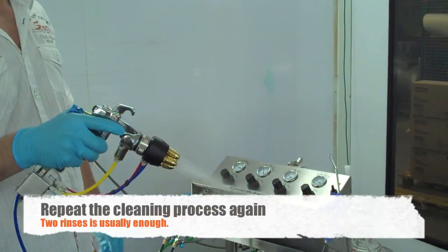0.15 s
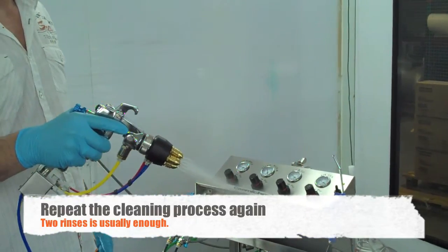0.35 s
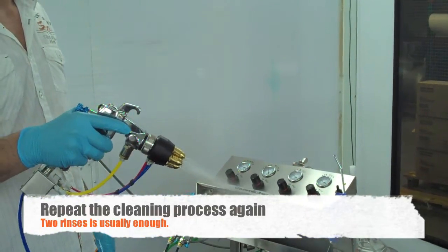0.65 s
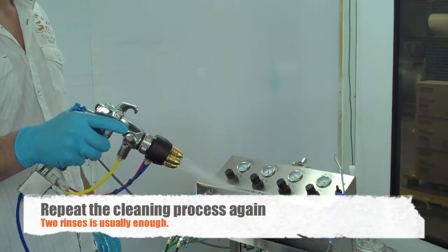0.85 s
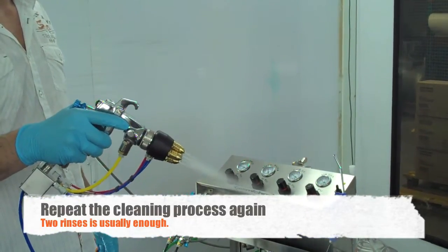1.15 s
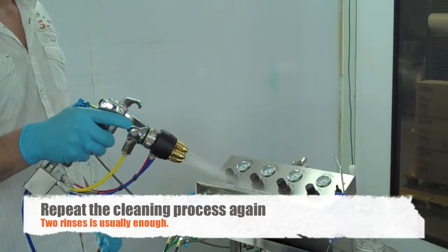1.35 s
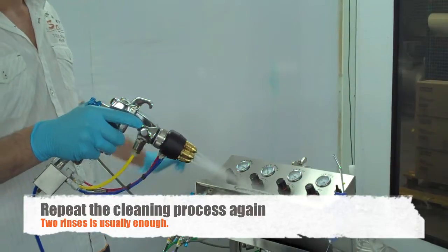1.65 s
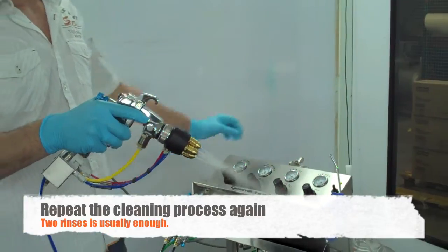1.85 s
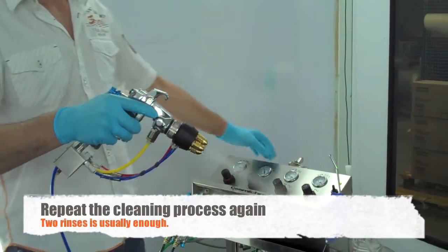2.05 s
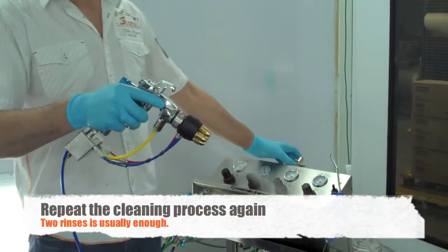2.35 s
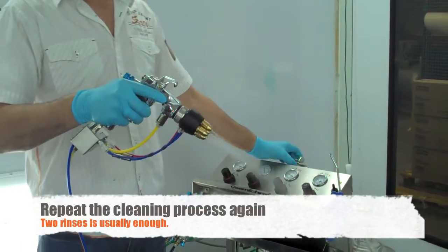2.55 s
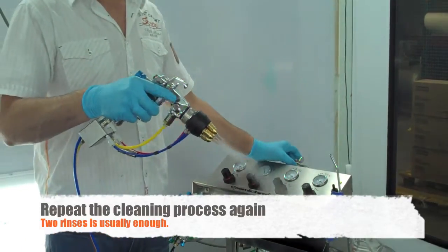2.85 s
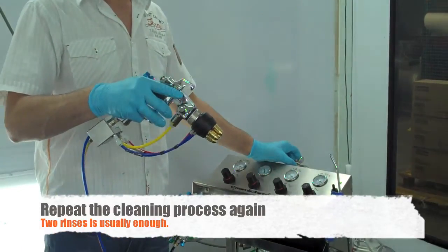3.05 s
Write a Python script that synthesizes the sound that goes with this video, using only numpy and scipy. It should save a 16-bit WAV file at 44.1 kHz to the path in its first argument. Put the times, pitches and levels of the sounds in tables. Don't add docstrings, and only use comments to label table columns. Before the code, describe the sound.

A spray gun's thin air leak swells for half a second, then the valve snaps open into a loud, steady, spitting hiss that stops abruptly, in a small hard-walled booth, picked up at arm's length.

```python
import sys
import numpy as np
from scipy import signal
from scipy.fft import rfft, irfft, next_fast_len
from scipy.io import wavfile
from scipy.ndimage import uniform_filter1d

SR = 44100
rng = np.random.default_rng(int(sys.argv[2]) if len(sys.argv) > 2 else 0)


def generate_wav(sig):
    pcm = np.round(np.clip(np.atleast_2d(sig).T, -1, 1) * 32767).astype(np.int16)
    wavfile.write(sys.argv[1], SR, pcm)


def convert_level_to_amplitude(level_db):
    exponent = np.asarray(level_db, float) / 20
    return 10 ** exponent


N = 141120
T = np.arange(N) / SR

# [t/s, blast level/dB, hose hum against blast/dB, fullness/(dB per octave)]
AIR_FLOW = [(.474, -17, -50, 0.5), (.51, -22, -24, -2), (.55, -23, -33, 0.), (.59, -22.5, -36, -0.5),
            (.65, -26, -40, -0.5), (.72, -21.5, -35, 0), (.79, -23., -37, .5), (.86, -23, -21.5, 0.),
            (1.05, -24, -15.5, 0.), (1.45, -24, -19, -0.5), (1.9, -23.5, -25, -0.55), (1.96, -22, -26, 0.5),
            (2.01, -25, -16.5, -1.5), (2.18, -23, -17, 0.), (2.22, -26.5, -23, -1.5),
            (2.6, -26.5, -23, -.5), (2.8, -24, -20.5, -1), (2.93, -26.5, -22.5, -.5)]
# [f/Hz, density/dB]
JET_SPECTRUM = [(200, -33.5), (520, -9), (1300, -6.5), (3600, -2.65), (6000, -4), (9300, -4),
                (11200, -11.5), (14300, -21.5)]
# [f/Hz, width/Hz, level against blast/dB, middle t/s, spread t/s]
NOZZLE_WHISTLES = [
    (680, 39, -26.5, 1., 1.),
    (1551, 32, -27.5, 1.1, 0.93),
    (4160, 45, -15, 1.1, 0.55),
    (5080, 44, -16, 2.6, 0.33),
    (7100, 45., -14, 2.5, 0.63),
    (8000, 45., -15, 1.7, .7),
]
# [f/Hz, density/dB]
LEAK_SPECTRUM = [(88, -48), (150, -13.5), (298, -19.5), (419, -15), (969, -3), (1450, -6), (2160, -0.5),
                 (9890, -5.5), (14200, -27)]
# [delay t/s, level/dB]
WALL_ECHOES = [
    (.00137, -25),
    (.00274, -17),
    (.0038, -14.5),
    (.0098, -8.5),
]
# [f/Hz, decay time t60/s]
BOOTH_DECAY = [(300, 0.46), (1000, 0.37), (3000, .31), (6000, 0.23), (9000, 0.19), (14000, 0.15)]
# [f/Hz, likeness/(0-1), left lead/rad, left over right level/dB]
PORT_PAIR = [(100, .9, 0., 0.), (600, .98, 0., 0.), (2000, .78, -.1, .3), (4000, .5, -.1, 0.),
             (6200, .2, .2, -1.), (9200, .25, 1.5, -6.3), (11500, .52, 2.9, 1.), (14000, .3, 2.5, 6.)]
# [f/Hz, density/dB]
ROOM_SPECTRUM = [(12, -27), (20, 13), (92, -21), (184, -24), (1050, -22), (1200, -35), (2540, -24),
                 (12000, -40), (15600, -78), (22000, -120)]

EDDIES = 4
CRACK_S, CRACK_DB = 0.416, 4.5
OPEN_S, OPEN_RISE_S = 0.472, 0.0038
SHUT_S, SHUT_DB_PER_S = 2.928, 805
SPIT_DB, SPIT_PER_S, SPIT_SPREAD_DB = -13.5, 1500., 4.0
HOSE_HZ, HOSE_WIDTH_HZ = 525, 47.6
LEAK_DB, LEAK_RISE_DB_PER_S = -36.5, 5
BOOTH_DB, HALL_DB, HALL_LONGER = 1, -13, 2.24
FLOOR_DB, FLOOR_SAME = -66, 0.55
DUCK_S, DUCK_DB = .58, -7


def blast():
    s, level_db, hum_db, full = np.transpose(AIR_FLOW)
    turbulence = white() * convert_level_to_amplitude(0.62 * slow(60))
    jet = coloured(turbulence + convert_level_to_amplitude(SPIT_DB) * droplets(), JET_SPECTRUM, 1.18, np.interp(T, s, full))
    air = white()
    jet = jet + nozzle_whistles(air)
    jet = jet + convert_level_to_amplitude(np.interp(T, s, hum_db) + 1.25 * slow(24.9)) * hose_hum(air)
    opening = np.clip((T - OPEN_S) / OPEN_RISE_S, 0, 1)
    return jet * convert_level_to_amplitude(np.interp(T, s, level_db) + 0.1 * slow(14)) * opening


def droplets():
    strength = convert_level_to_amplitude(SPIT_SPREAD_DB * np.minimum(rng.exponential(1, N), 5))
    clicks = strength * (rng.random(N) < SPIT_PER_S / SR)
    return evened(clicks * np.sign(white()))


def nozzle_whistles(air):
    whistles = 0
    for hz, width, db, middle, spread in NOZZLE_WHISTLES:
        level_db = db + 1.6 * slow(5.7) - 3.7 * ((T - middle) / spread) ** 2
        whistles = whistles + convert_level_to_amplitude(level_db) * evened(resonate(air, hz, width))
    return whistles


def hose_hum(air):
    hum = resonate(air, HOSE_HZ, HOSE_WIDTH_HZ)
    return evened(resonate(hum, HOSE_HZ, 1.42 * HOSE_WIDTH_HZ))


def leak():
    lift_db = CRACK_DB * np.clip((T - CRACK_S) / (OPEN_S - CRACK_S), 0, 1)
    closing = 1 - np.clip((T - OPEN_S) / 0.05, 0, 1)
    hiss = coloured(white(), LEAK_SPECTRUM, patchy_db=2.0) * closing
    return hiss * convert_level_to_amplitude(LEAK_DB + LEAK_RISE_DB_PER_S * (T - .2) + lift_db + .4 * slow(8))


def valve():
    return convert_level_to_amplitude(-SHUT_DB_PER_S * np.maximum(T - SHUT_S, 0))


def booth():
    out = np.zeros((EDDIES, SR // 2))
    out += convert_level_to_amplitude(BOOTH_DB) * ringing(1)
    out += convert_level_to_amplitude(HALL_DB) * ringing(HALL_LONGER)
    out[:, 0] += 1
    for s, db in WALL_ECHOES:
        out[:, round(s * SR)] += convert_level_to_amplitude(db)
    return out / np.linalg.norm(out)


def ringing(longer):
    taps = np.zeros((EDDIES, SR))
    at = np.arange(120, SR - 20, 20) + rng.integers(0, 20, (EDDIES, (SR - 121) // 20))
    np.put_along_axis(taps, at, rng.choice([-1., 1.], at.shape), 1)
    hz, t, z = signal.stft(taps, SR, nperseg=128)
    fade = convert_level_to_amplitude(-60 * t / (longer * read(BOOTH_DECAY, hz)[:, None]))
    fade_energy = (fade ** 2).sum(1, keepdims=True)
    tail = signal.istft(z * fade / np.sqrt(fade_energy), SR, nperseg=128)[1][:, :SR // 2]
    return tail / np.linalg.norm(tail, axis=1, keepdims=True)


def ports(paths):
    size = next_fast_len(N + 4096)
    hz = np.fft.rfftfreq(size, 1 / SR)
    a, b = rfft(paths, size)
    same = np.clip(read(PORT_PAIR, hz, col=1), 0, 1)
    lead = read(PORT_PAIR, hz, col=2)
    side = convert_level_to_amplitude(read(PORT_PAIR, hz, col=3) / 2)
    right = same * a * np.exp(-1j * lead) + np.sqrt(1 - same ** 2) * b
    return irfft(np.array([a * side, right / side]), size)[:, :N]


def room_tone():
    a, b = coloured(rng.standard_normal((2, N)), ROOM_SPECTRUM, patchy_db=3.0)
    right = FLOOR_SAME * a + np.sqrt(1 - FLOOR_SAME ** 2) * b
    duck_db = DUCK_DB * (np.clip((T - DUCK_S) / .1, 0, 1) - 1)
    return convert_level_to_amplitude(FLOOR_DB + duck_db) * np.array([a, right])


def white():
    return rng.standard_normal((EDDIES, N))


def coloured(x, shape, patchy_db, tilt=0 * T):
    hz, t, z = signal.stft(x, SR, nperseg=512, noverlap=256)
    patches = uniform_filter1d(rng.standard_normal(z.shape[1:]), size=6, axis=0)
    patches = evened(uniform_filter1d(patches, size=12, axis=1))
    octaves_below = -np.log2(np.maximum(hz, 300) / 4000)[:, None]
    slope = octaves_below * np.interp(t, T, tilt)
    z = z * convert_level_to_amplitude(read(shape, hz)[:, None] + patchy_db * patches + slope)
    return evened(signal.istft(z, SR, nperseg=512, noverlap=256)[1][:, :N])


def resonate(x, hz, width):
    return signal.lfilter(*signal.iirpeak(hz, hz / width, SR), x)


def slow(rate):
    t = T[::64]
    wave = 0
    for f in np.geomspace(rate / 20, rate, 24):
        wave = wave + np.sin(2 * np.pi * (f * t + rng.random())) / np.sqrt(f)
    return np.interp(T, t, evened(wave))


def evened(x):
    return x / np.sqrt(np.mean(x ** 2) + 1e-20)


def read(points, hz, col=1):
    p = np.array(points, float)
    return np.interp(np.log(hz + 1), np.log(p[:, 0] + 1), p[:, col])


def scene():
    gun = (blast() + leak()) * valve()
    early = np.c_[gun[:, 8000:0:-1], gun]
    heard = signal.fftconvolve(early, booth(), axes=1)[:, 8000:8000 + N]
    paths = np.sqrt(2) * heard.reshape(2, -1, N).sum(1)
    return ports(paths) + room_tone()


def band_limit(x):
    return signal.sosfilt(signal.butter(12, 14510, fs=SR, output="sos"), x)


def record(dry):
    lowpass = signal.firwin(1023, 14310, window=("kaiser", 9), fs=SR)
    mix = signal.oaconvolve(dry, lowpass[None], "same")
    return band_limit(mix)


dry = scene()
out = record(dry)
generate_wav(out)
```